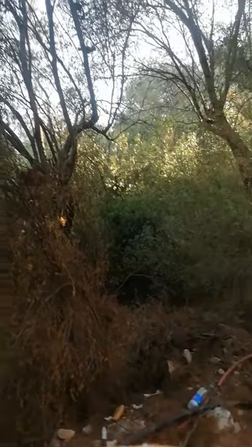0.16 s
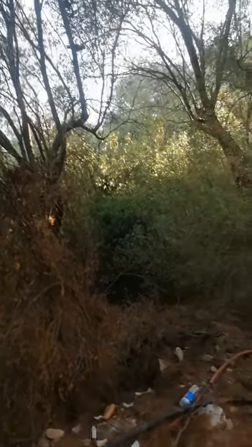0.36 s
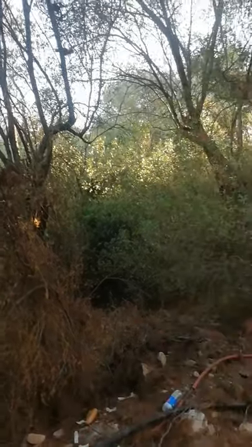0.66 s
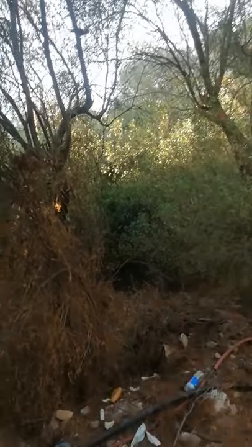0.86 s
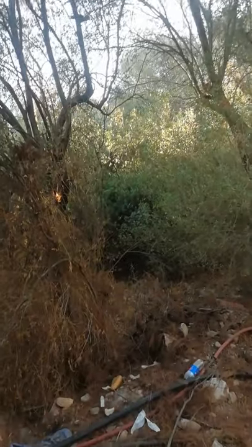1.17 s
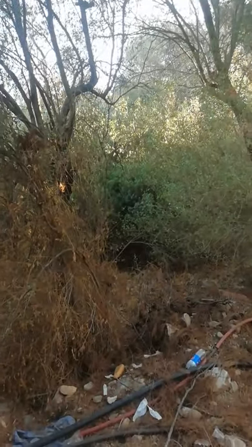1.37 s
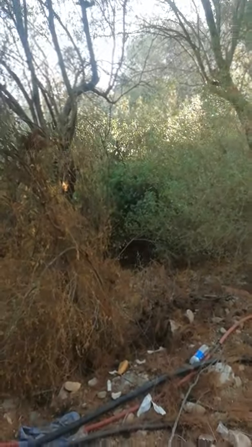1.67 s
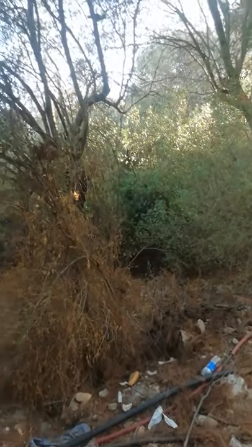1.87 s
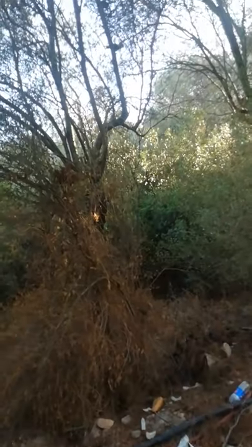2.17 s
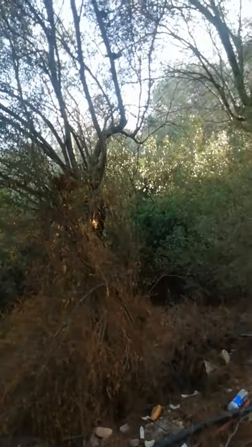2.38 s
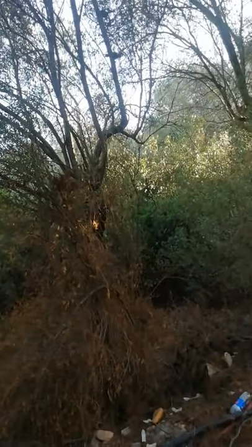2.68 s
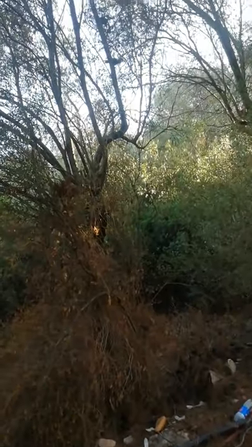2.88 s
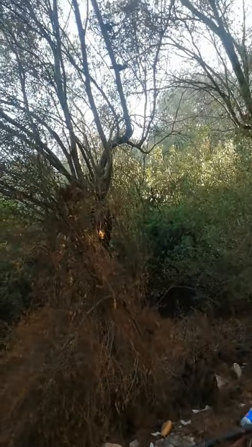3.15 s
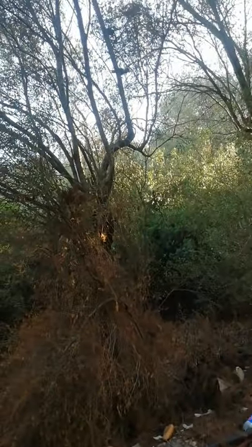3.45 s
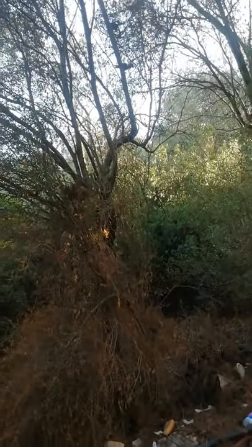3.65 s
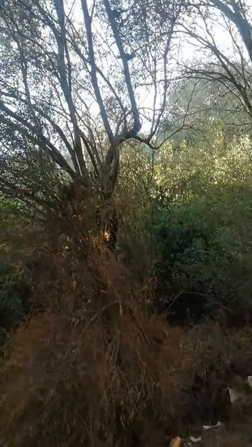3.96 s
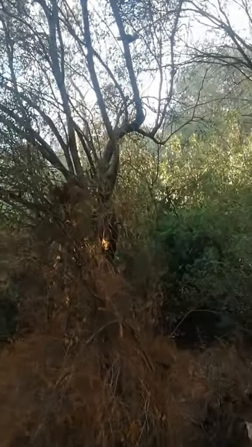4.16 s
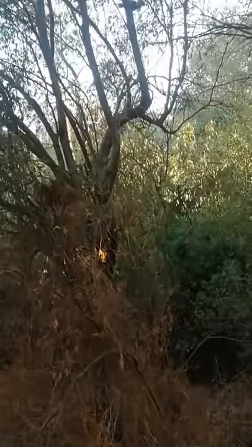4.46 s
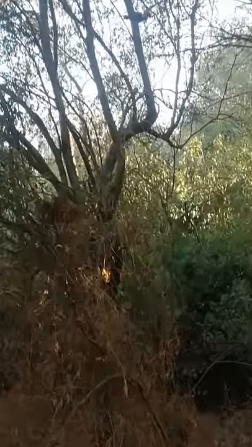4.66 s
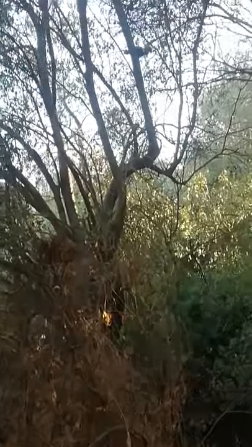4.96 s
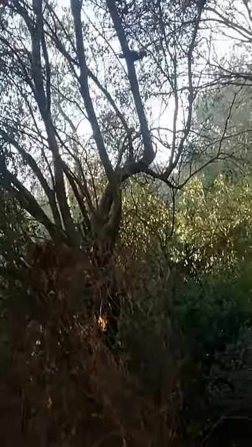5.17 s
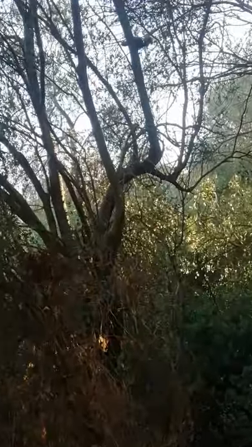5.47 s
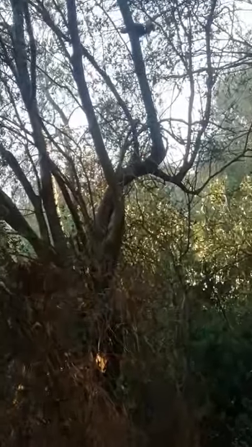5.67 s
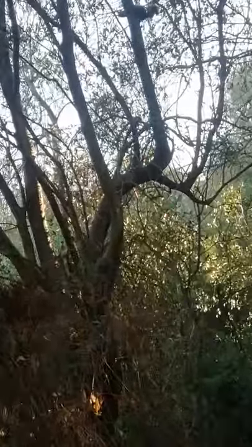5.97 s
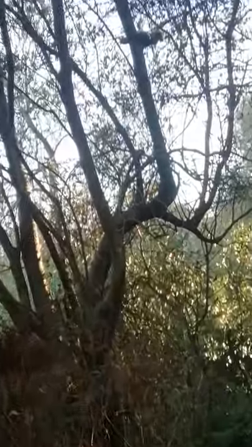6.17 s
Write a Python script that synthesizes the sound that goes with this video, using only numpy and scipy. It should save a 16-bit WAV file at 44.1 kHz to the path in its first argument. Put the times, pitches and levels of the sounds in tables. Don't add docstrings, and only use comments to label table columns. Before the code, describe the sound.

Outdoors among trees, short rising chirps with a hissy rasp repeat about five a second in bursts, with a low phone bump and soft rubbing.

```python
import sys
import numpy as np
from scipy import signal
from scipy.fft import rfft, irfft, next_fast_len
from scipy.io import wavfile
from scipy.ndimage import map_coordinates

SR = 44100
rng = np.random.default_rng(int(sys.argv[2]) if len(sys.argv) > 2 else 0)


def decibels_to_gain(level_db):
    exponent = np.asarray(level_db, float) / 20
    return 10 ** exponent


def pcm_store(signal):
    levels = np.round(np.clip(np.atleast_2d(signal), -1, 1) * 32767)
    wavfile.write(sys.argv[1], SR, levels.astype(np.int16).T)


N = 279153

# start_s, length_s, top_pitch_hz, squeak_db, rasp_db
CALLS = [(.387, .072, 2235, -40.5, -36), (.592, .05, 2218, -42, -30.5), (.777, .052, 2232, -42, -34),
         (0.971, .043, 2200, -44, -38), (2.26, .04, 2393, -36.5, -28.5), (2.41, .045, 2316, -38.5, -27.5),
         (2.582, .047, 2216, -43.5, -32), (2.768, .05, 2153, -40.5, -35), (2.953, .042, 2225, -42, -35.5),
         (3.166, .052, 2169, -42, -43.5), (3.984, .063, 2298, -37.5, -36.5), (4.18, .051, 2230, -43, -32),
         (4.367, .041, 2135, -42, -35), (4.542, .044, 2168, -41, -36.5), (4.717, .039, 2174, -42, -38),
         (4.908, .048, 2088, -46, -46), (5.116, .046, 2150, -42.5, -49), (5.308, .048, 2113, -43.5, -43),
         (5.494, .043, 2113, -44.5, -42), (5.679, .045, 2100, -45, -41), (5.878, .045, 2039, -44, -45),
         (6.074, .038, 2011, -45, -46.5), (6.269, .052, 2060, -43, -51.5)]
# after_start_s, share_of_top_pitch, squeak_change_db, rasp_change_db
GLIDE = [
    (0, .63, -18.5, -17),
    (.008, .7, -12, -5.5),
    (.016, .83, -6.5, 1),
    (.025, .94, -5, -3),
]
# time_s, pitch_hz, squeak_db, rasp_db
GROWL = [
    (2.124, 1750, -58, -33.5),
    (2.138, 1825, -52, -34.5),
    (2.152, 1900, -42, -31),
    (2.165, 1997, -44, -41.5),
    (2.179, 2016, -40, -39),
    (2.194, 2030, -39.5, -50),
    (2.198, 2385, -41.5, -48.5),
    (2.208, 2340, -42.5, -54),
]
# start_s, end_s, half_pitch_level_db
DOUBLING = (1.753, 2.197, -2.6)
# frequency_hz, level_db
THROAT = [(1000, -27), (2100, -6), (3000, 2), (4200, -0.5), (5200, -12), (6700, 6), (8200, 0.5),
          (10000, -17), (13000, -22.5), (16000, -50)]
# lower_hz, upper_hz
MOUTH_HZ = (6600, 8200)
# lower_lift_db, upper_lift_db
GROWL_MOUTH = (.5, 3.9)
# frequency_hz, level_db (per Hz)
RASP_COLOUR = [(900, -36.5), (1350, -9), (1900, -34.5), (2600, -4), (3300, -18), (4200, -6.5),
               (5100, -16.5), (6100, -8.5), (7000, 7), (8200, -3.5), (9500, -15), (15500, -33)]
# start_s, level_db
PUFFS = [(0.208, -53.5), (0.363, -45.5), (0.581, -48), (0.767, -49), (0.956, -50), (1.208, -60),
         (2.101, -49.5), (2.249, -48), (2.402, -46.5), (2.571, -47), (2.755, -49), (2.941, -51.5),
         (3.135, -52.5), (3.957, -52.5), (4.172, -49.5), (4.351, -48), (4.529, -47.5), (4.704, -49.5),
         (4.893, -51), (5.095, -52), (5.294, -51.5), (5.484, -49.5), (5.663, -51.5), (5.857, -51.5),
         (6.053, -51.5), (6.248, -53)]
# frequency_hz, level_db (per Hz)
PUFF_COLOUR = [(1800, -3), (2700, 2.5), (5500, -12), (7600, 7.5), (10200, -3.5), (11700, -3), (13000, -10),
               (15500, -22)]
# frequency_hz, level_db
FIRST_RUN_COLOUR = [(2200, -2.5), (3000, -2), (4300, 3), (4750, -1.5), (5050, -9), (5500, 2), (6300, 0)]
# frequency_hz, time_to_fall_60_db_s
TREE_ECHO = [(1500, 0.4), (4000, 0.27), (7000, 0.24), (12000, 0.26)]
# frequency_hz, level_db
COVERED_PORT = [(60, 0), (200, 2), (380, 0), (600, -2), (1300, -13), (2400, -21), (4400, -22), (7000, -30),
                (9000, -36), (15000, -40)]
# start_s, pitch_hz, peak_db, time_to_fall_60_db_s, rise_s
BUMPS = [
    (0.153, 41, -28, 0.076, 0.0056),
    (0.273, 160, -22.5, 0.032, 0.0028),
    (0.2795, 56, -4.5, 0.073, 0.021),
    (0.318, 44.3, -29.5, 0.15, .003),
    (1.876, 45, -29, 0.027, 0.0055),
    (3.526, 46, -24, 0.036, 0.006),
]
# start_s, lower_ring_db, upper_ring_db, push_db
KNOCKS = [
    (0.3631, -46, -38, -41),
    (3.5134, -37.5, -51, -34),
    (3.652, -66, -66, -46),
]
# start_s, left_db, right_db
TICKS = [
    (0.322, -21.5, -60),
    (0.362, -28, -22),
]
# pitch_hz, level_db, time_to_fall_60_db_s
CAVITY = [(520, 0, .03), (920, 1, .018)]
# frequency_hz, level_db (per Hz)
THUD_COLOUR = [(60, 1), (200, 4), (600, -4), (900, -7.5), (1200, -26)]
# start_s, length_s, level_db, change_db
RUBS = [
    (.46, .07, -56, -3),
    (.575, 0.071, -54, 1),
    (.65, 0.077, -48, -6.5),
    (3.515, 0.041, -60, -8),
]
# time_s, nearness_db
NEARNESS = [(0.0, -60), (0.25, -65), (0.42, -60.5), (1.18, -66), (1.45, -61.5), (1.62, -66), (2.2, -65),
            (2.5, -61.5), (3.03, -68.5), (4.23, -68), (4.41, -64), (4.76, -64.5), (5.18, -61.5),
            (5.41, -64), (5.98, -66), (6.33, -64.5)]
# frequency_hz, level_db (per Hz)
RUMBLE_COLOUR = [(15, -34), (24, -4), (45, -1), (65, -2), (81, -1.5), (92, -10), (110, -11.5), (150, -21),
                 (200, -31)]
HUM_COLOUR = [(110, -12), (170, -7), (260, -0.5), (380, -5.5), (520, -9.5), (700, -34)]
SWELL_COLOUR = [(380, -6), (460, -8.5), (650, -3), (850, -7), (1000, -13)]
ROAD_COLOUR = [(700, -17.5), (900, 0.5), (1100, -1), (1500, 0.5), (2200, -3.5), (3500, -11), (5500, -15.5),
               (7500, -12.5), (9500, -25.5), (15500, -59)]
# start_s, length_s, level_db, change_db
DRONES = [
    (.4, 0.48, -53.5, -11),
    (1.7, 0.52, -56.5, -0.5),
    (2.3, 0.47, -58, -10),
    (3.1, 0.2, -63.5, -10),
    (4.65, 0.26, -59, 4),
    (5.1, 0.28, -50.5, -5.5),
    (6.15, .12, -55, 5),
]
# frequency_hz, level_db (per Hz)
DRONE_COLOUR = [(66, -23), (76, -4.5), (82, 1), (88, -6.5), (100, -33)]
# start_s, length_s, level_db, change_db
WHINES = [
    (4.57, .04, -56, 1),
    (4.71, 0.34, -51, -13),
    (5.09, 0.0483, -49.5, -1.5),
    (5.62, 0.16, -62, 0.5),
]


def voice():
    pitch, squeak_db, rasp_db, *lifts = curves(voice_rows())
    start, end, half_db = DOUBLING
    doubled, = curves([(start - .004, 0), (start, 1), (end, 1), (end + 0.0014, 0)])
    strain = (1 - .7 * doubled) * np.clip((rasp_db - squeak_db + 12) / 18, 0, 1)
    pitch = pitch * (1 + .01 * wobble(300) + (.006 + .025 * strain) * wobble(900))
    phase = 2 * np.pi * np.cumsum(pitch) / SR
    slack = (1 - doubled) / (1 + np.exp((pitch - 1850) / 40))
    squeak = np.zeros(N)
    for partial in np.arange(1, 15) / 2:
        hz = partial * pitch
        share = decibels_to_gain(half_db) * doubled if partial % 1 else 1
        mouth_db = sum(db * np.exp(-((hz - centre) / 900) ** 2) for db, centre in zip(lifts, MOUTH_HZ))
        if partial == 2:
            mouth_db -= 0.49 * lifts[1]
        level_db = along(THROAT, hz) + mouth_db + 2.5 * wobble(200) - 18 * slack * (partial % 2 == 1)
        squeak += share * decibels_to_gain(level_db) * np.sin(partial * phase + rng.uniform(0, 2 * np.pi))
    clumps = unit(decibels_to_gain(1.8 * wobble(350)) * (1 + .3 * np.cos(phase / 2)))
    rasp = decibels_to_gain(rasp_db + 0.77) * clumps * noise(RASP_COLOUR)
    return np.sqrt(2) * decibels_to_gain(squeak_db) * squeak + rasp


def voice_rows():
    calls = [(call(*row), mouth_for(row[2])) for row in CALLS]
    calls.append((list(GROWL), GROWL_MOUTH))
    rows = []
    for shape, mouth in sorted(calls):
        s, hz, squeak, rasp = shape[0]
        opening = [(s - .012, hz, -120, -120), (s - .01, .9 * hz, squeak - 20, rasp - 15)]
        s, hz, squeak, rasp = shape[-1]
        closing = [(s + .004, .87 * hz, squeak - 15, rasp - 8),
                   (s + .009, .68 * hz, squeak - 26, rasp - 30),
                   (s + .014, hz, -120, -120)]
        rows += [(*row, *mouth) for row in opening + shape + closing]
    return rows


def call(s, length, top_hz, squeak_db, rasp_db):
    glide_s = GLIDE[-1][0]
    hidden_db = 0.89 * max(rasp_db - squeak_db + 0.5, 0)
    extra_s = length - .046
    top_s = glide_s + np.clip(.5 + 8.35 * extra_s, .2, .9) * (length - glide_s)
    shape = []
    for t, share, db, air_db in GLIDE:
        shape.append((t, share, db - hidden_db * (t < glide_s) - 198 * extra_s, air_db))
    shape += [(top_s, 1, 0, -16.5), (length, .97, -2.5, -17.5)]
    return [(s + t, share * top_hz, squeak_db + db, rasp_db + air_db) for t, share, db, air_db in shape]


def mouth_for(top_hz):
    wide_khz = (top_hz - 2150) / 1000
    return 17.5 * wide_khz, -1.5 - 37 * wide_khz


def puffs():
    t = np.arange(SR // 5) / SR
    full, thin = np.zeros(N), np.zeros(N)
    for s, db in PUFFS:
        fade = 1 / (1 + (t / 0.062) ** 6)
        jet = decibels_to_gain(db + 3.5 - 60 * t / 0.36) * (1 - np.exp(-t * 300)) * fade
        body = 1 / (1.5 + np.exp((-52 - db) / 3))
        add(full, s, body * jet)
        add(thin, s, (1 - body) * jet)
    air = noise(PUFF_COLOUR)
    top = filtered(air, lambda hz: 0.36 + 0.61 / (1 + (9500 / (hz + 1)) ** 6))
    return (full * air + decibels_to_gain(2.5) * thin * top) * decibels_to_gain(1.4 * wobble(200))


def first_run_colour(animal):
    early = np.arange(N) < 1.5 * SR
    return np.where(early, filtered(animal, lambda hz: decibels_to_gain(along(FIRST_RUN_COLOUR, hz))), animal)


def trees(x):
    out, step = np.zeros(N + SR), SR // 6
    for i in range(0, N, step):
        hz, t, z = signal.stft(rng.standard_normal(SR // 2), SR, nperseg=256)
        fading = z * decibels_to_gain(-60 * t / along(TREE_ECHO, hz)[:, None])
        tail = signal.istft(fading, SR, nperseg=256)[1]
        add(out, i / SR + .006, signal.fftconvolve(x[i:i + step], tail / np.linalg.norm(tail)))
    return out[:N] * decibels_to_gain(2.2 * wobble(90))


def case_bumps():
    out = np.zeros(N)
    for s, hz, db, t60, rise in BUMPS:
        add(out, s, ring(hz, db, t60, rise))
    for s, _, _, push_db in KNOCKS:
        add(out, s, ring(166, push_db, 0.022, 0.00041))
    return out


def finger():
    out = np.zeros(N)
    (low_hz, _, low_t60), (high_hz, _, high_t60) = CAVITY
    t = np.arange(SR // 10) / SR
    for s, low_db, high_db, _ in KNOCKS:
        low = ring(low_hz, low_db, low_t60, rise=.0006)
        high = ring(high_hz, high_db, high_t60, rise=.0006)
        add(out, s, low - high)
        add(out, s, noise(THUD_COLOUR)[SR:SR + SR // 10] * decibels_to_gain(low_db - 1.5 - 60 * t / 0.027))
    slips = rng.standard_normal(N) * decibels_to_gain(4 * wobble(70))
    hollow = sum(ring(hz, db, 0.73 * t60, 0.00062) for hz, db, t60 in CAVITY)
    out += decibels_to_gain(strokes(RUBS, 0.0044)) * unit(signal.fftconvolve(slips, hollow)[:N])
    return out * decibels_to_gain([[-9], [.1]])


def nail_ticks():
    ticks = np.zeros((2, N))
    for s, *side_db in TICKS:
        snap = np.diff(rng.standard_normal(200)) * decibels_to_gain(-60 * np.arange(199) / SR / .003)
        for track, db in zip(ticks, side_db):
            add(track, s, decibels_to_gain(db - 6.5) * snap)
    return filtered(ticks, lambda hz: 1 / (1 + (hz / 10500) ** 6))


def traffic():
    t, (near,) = np.arange(N) / SR, curves(NEARNESS)
    near = near - near.mean()
    passing = np.exp(-((t - 5.2) / 0.2) ** 2)
    recedes_db = 5.5 * np.clip(1 - (t - 1.29) / (2.78 - 1.29), 0, 1)
    rumble_db = -57 + 0.68 * near + 3.6 * passing
    hum_db = -61.5 + near + 1.95 * passing
    swell_db = -63.5 + 1.5 * near + 9.8 * passing
    road_db = -60 + recedes_db + 0.46 * near + 3.5 * passing
    rumble = decibels_to_gain(rumble_db + 1.5 * wobble(9)) * noise(RUMBLE_COLOUR)
    hum = decibels_to_gain(hum_db + 1.4 * wobble(6.11)) * noise(HUM_COLOUR)
    swell = decibels_to_gain(swell_db + 0.4 * wobble(6.4)) * noise(SWELL_COLOUR)
    road = decibels_to_gain(road_db + 0.6 * wobble(5.376)) * noise(ROAD_COLOUR)
    return rumble + hum + swell + road


def idling_engine():
    return decibels_to_gain(strokes(DRONES, 0.069)) * noise(DRONE_COLOUR)


def far_whine():
    phase = 2 * np.pi * np.cumsum(805 + 12 * wobble(50)) / SR
    return decibels_to_gain(strokes(WHINES, .02) + 3 * wobble(30)) * np.sin(phase)


def ring(hz, db, t60, rise):
    t = np.arange(SR // 4) / SR
    return decibels_to_gain(db - 60 * t / t60) * (1 - np.exp(-t / rise)) * np.sin(2 * np.pi * hz * t)


def noise(spectrum):
    low_hz, high_hz = spectrum[0][0], spectrum[-1][0]

    def colour(hz):
        return decibels_to_gain(along(spectrum, hz)) * ((hz > low_hz) & (hz < high_hz))

    return unit(filtered(rng.standard_normal(N), colour))


def strokes(rows, edge_s):
    points = []
    for s, length, db, change_db in rows:
        end = s + length
        points += [(s - edge_s, -95), (s, db), (end, db + change_db), (end + edge_s, -95)]
    return curves(points)[0]


def wobble(rate):
    return map_coordinates(rng.standard_normal(int(N * rate / SR) + 4), [np.arange(N) * rate / SR])


def curves(rows):
    s, *columns = np.transpose(rows)
    return [np.interp(np.arange(N) / SR, s, column) for column in columns]


def along(points, hz):
    f, v = np.transpose(points)
    return np.interp(np.log(hz + 1), np.log(f + 1), v)


def filtered(x, response):
    m = next_fast_len(N + SR // 2)
    return irfft(rfft(x, m) * response(np.fft.rfftfreq(m, 1 / SR)), m)[..., :N]


def add(track, s, sound):
    part = track[round(s * SR):][:len(sound)]
    part += sound[:len(part)]


def unit(x):
    return x / np.sqrt(np.mean(x ** 2) + 1e-20)


def covered_port(air):
    def leak(hz):
        lag = 2 * np.pi * hz * .00052 + np.arctan(hz / 300)
        return decibels_to_gain(along(COVERED_PORT, hz)) * np.exp(-1j * lag)

    return filtered(air, leak)


def scene():
    animal = first_run_colour(voice() + puffs())
    background = traffic() + idling_engine() + far_whine()
    left = animal + decibels_to_gain(-9.0) * trees(animal) + background + case_bumps()
    return np.array([left, covered_port(left)]) + finger() + nail_ticks()


def roll_off(x):
    return signal.sosfilt(signal.butter(12, 15720, fs=SR, output="sos"), x)


def record(dry):
    colour = [(30, -4), (150, 20.5), (1000, 13.5), (4000, 7.5), (10000, 1.5), (16000, -3.5)]
    hiss = np.array([noise(colour) for _ in dry])
    return roll_off(dry + decibels_to_gain(-67) * hiss)


dry = scene()
out = record(dry)
pcm_store(out)
```